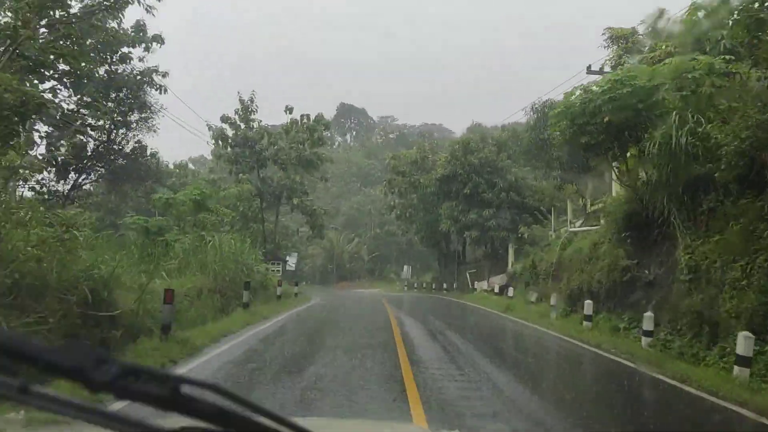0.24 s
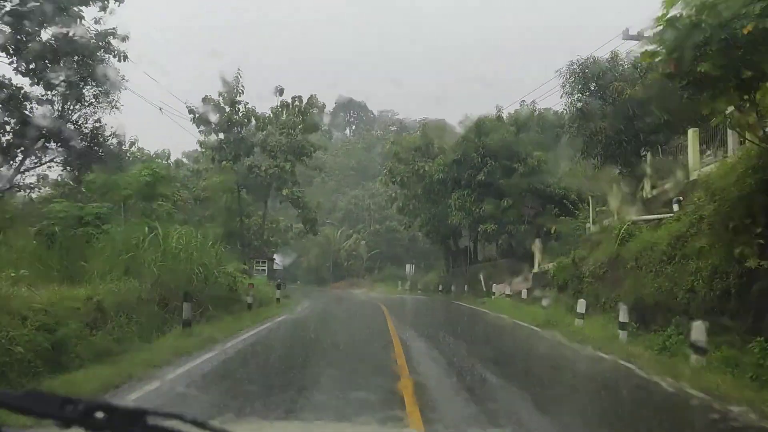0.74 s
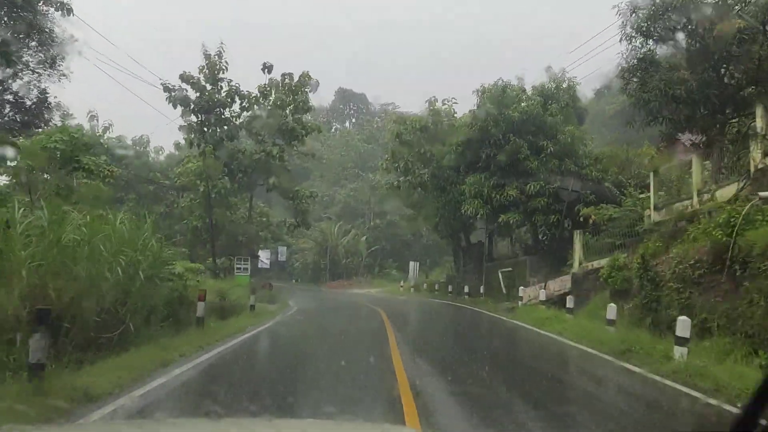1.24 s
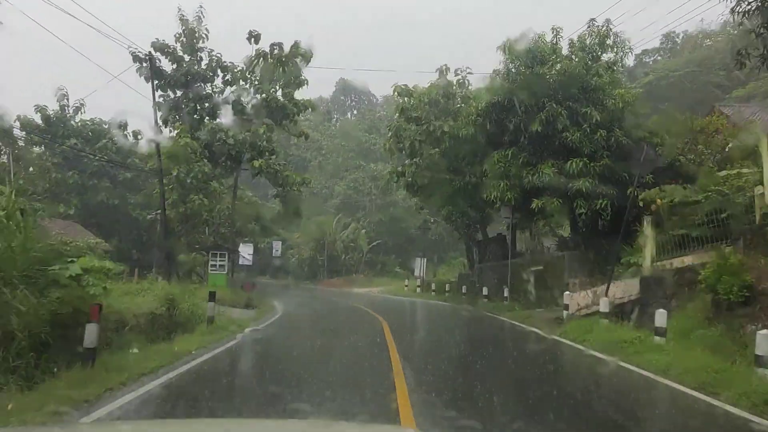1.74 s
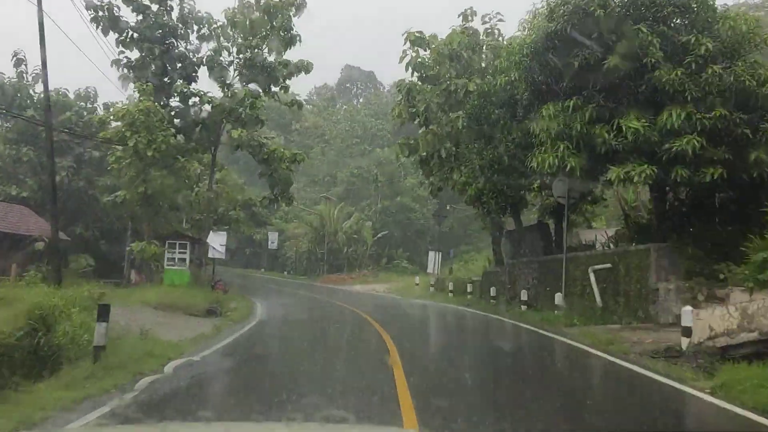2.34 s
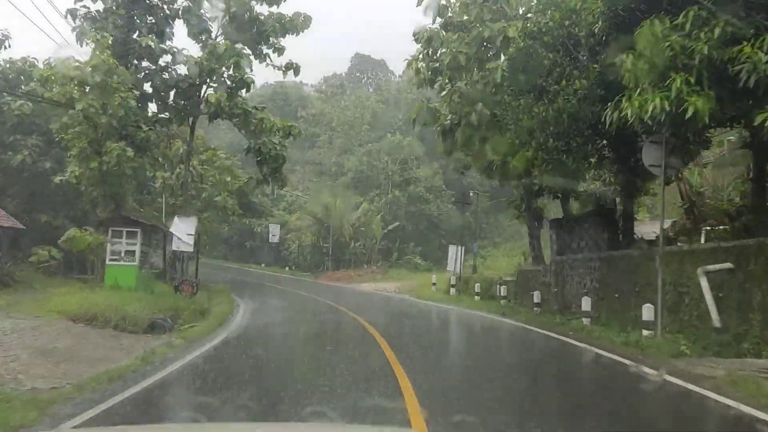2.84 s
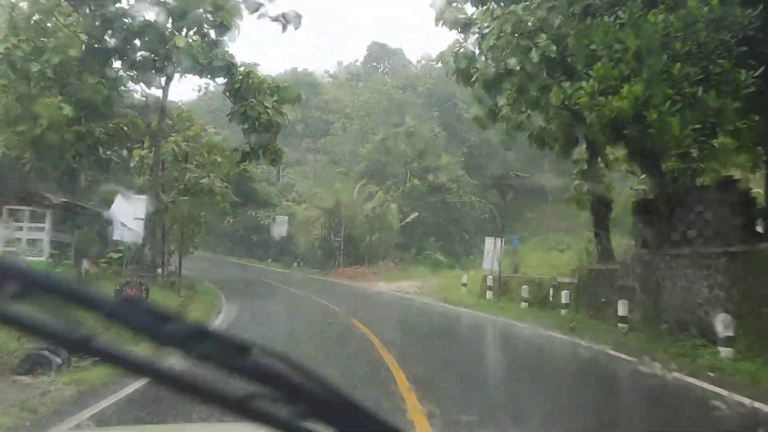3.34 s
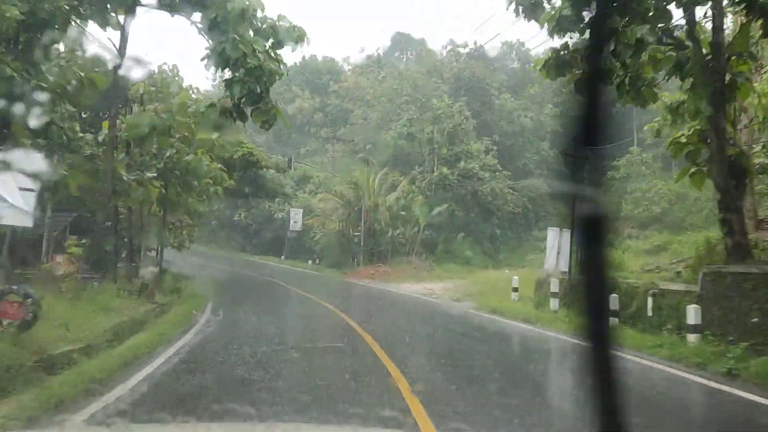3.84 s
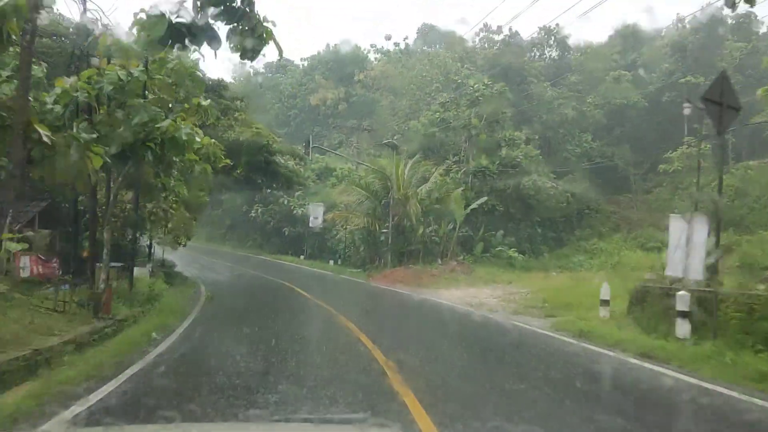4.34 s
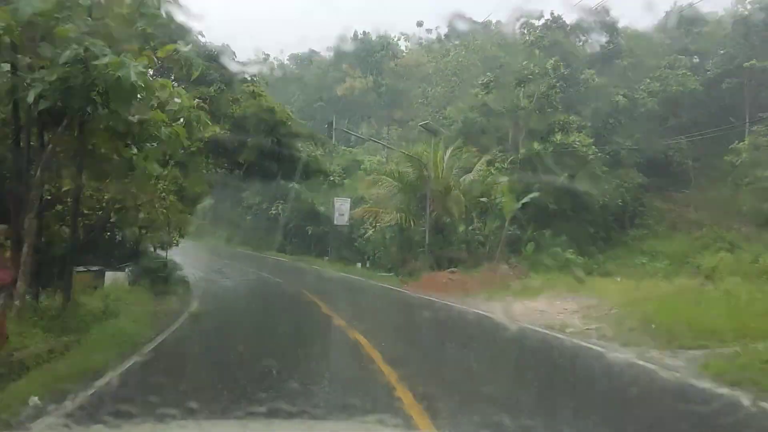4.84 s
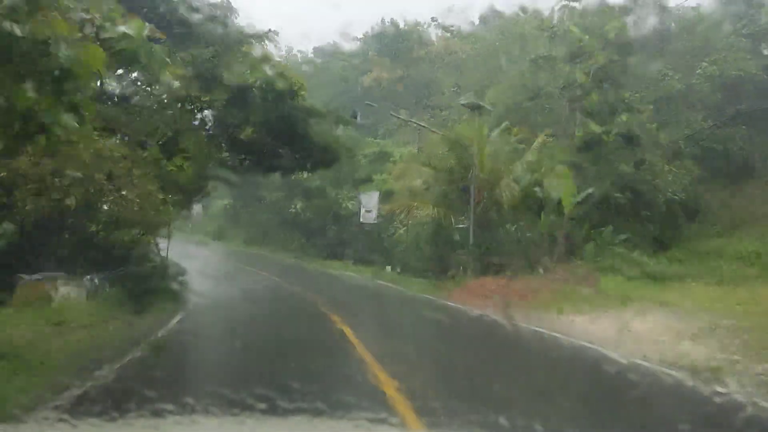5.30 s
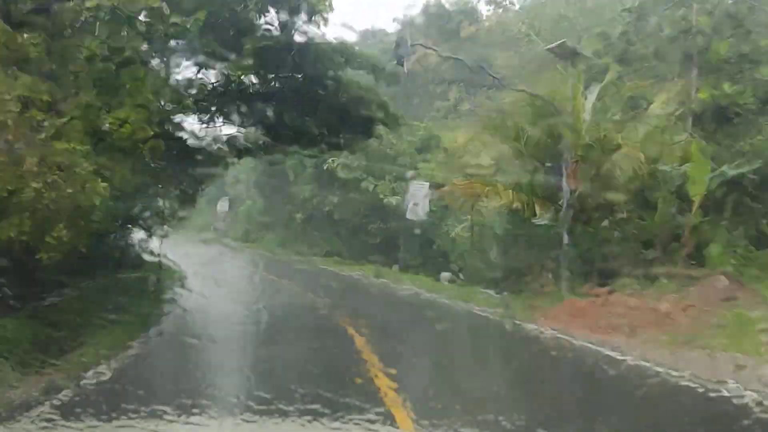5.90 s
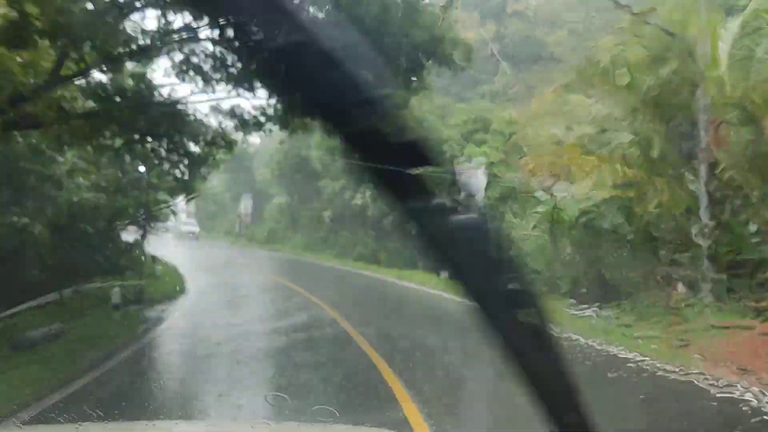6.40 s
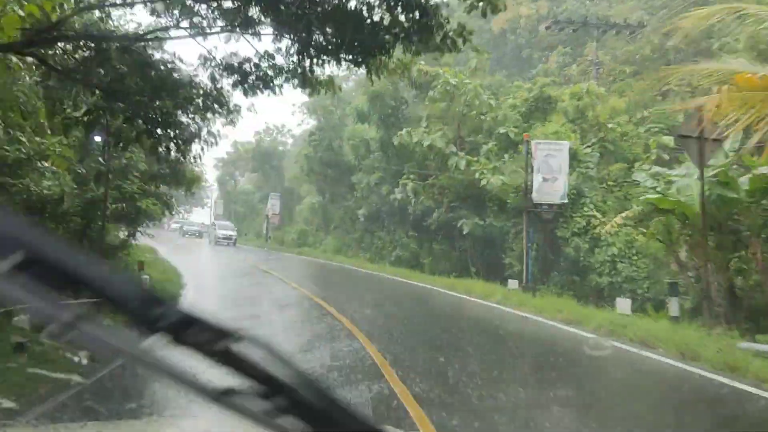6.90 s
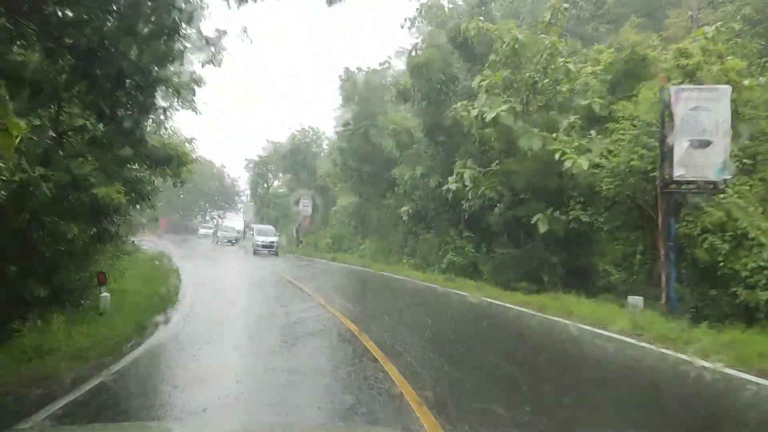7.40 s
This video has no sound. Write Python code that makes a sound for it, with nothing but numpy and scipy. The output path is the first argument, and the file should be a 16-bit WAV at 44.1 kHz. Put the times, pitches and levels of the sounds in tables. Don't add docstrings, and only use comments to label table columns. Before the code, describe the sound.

Inside a car travelling at nearly constant speed on a wet road, heard in stereo from the dashboard for about 7.7 seconds. Deep, throbbing tyre boom, engine hum and low road roar run throughout, the pitch rising very slightly towards the end. Above them heavy rain keeps up a dense, bright, grainy patter and hiss with a drumming roof panel, fluttering gently and a little softer from about 3 to 6.5 seconds. Irregular drips tick and pop on the glass from 0.2 seconds, with fat ones near 2.0, 2.1 and 2.5. From 4.2 knocks become more frequent; at 5.2 to 5.5 a cluster of roof knocks, glassy tocks and short dull splats arrives. Scattered drips follow until 7.1, when loads of water shed by branches hit, strongest near 7.3, with rapid hard knocks continuing to the end.

```python
import sys
import numpy as np
from scipy import signal
from scipy.fft import rfft, irfft, next_fast_len
from scipy.io import wavfile
from scipy.ndimage import uniform_filter1d

SR = 44100
rng = np.random.default_rng(int(sys.argv[2]) if len(sys.argv) > 2 else 0)


def linear_from_db(decibels):
    return 10 ** (np.asarray(decibels, float) / 20)


def inscribe(sig):
    pcm = np.round(np.clip(np.atleast_2d(sig).T, -1, 1) * 32767)
    wavfile.write(sys.argv[1], SR, pcm.astype(np.int16))


N = 337615
WHEEL_HZ, SHAFT_HZ, FIRING_HZ = 4.545, 20.22, 57.75
HALVES = np.array([[.5], [-.5]])

# time in seconds, speed as a factor on cruising.
ROAD_SPEED = [(0.0, 1.0002), (0.7, 0.999), (1.39, 0.9996), (2.09, 1.0004), (2.79, 0.9971), (3.48, 0.9896),
              (4.18, 0.9841), (4.87, 0.9886), (5.57, 0.9975), (6.27, 1.0105), (6.96, 1.0282),
              (7.66, 1.0454)]
# time in seconds, first shaft order in dB, second order in dB, engine load in dB.
DRIVE_LEVELS = [(0, -12.5, -22, 3), (.63, -16.5, -14, 0), (1.27, -13, -17, 3), (1.9, -14.5, -19.5, 1),
                (2.5, -15.5, -20, -3), (3.2, -24, -24.5, -3.5), (3.8, -18.5, -15.5, -3),
                (4.4, -15.5, -20.5, -5), (5.1, -14, -14, 1), (5.7, -23, -16.5, -17), (6.3, -12, -16.5, -1),
                (7, -17.5, -35, 1.5), (7.66, -17, -13.5, 7)]
# multiple of the firing rate, rms level in dB, share of the load change.
ENGINE_ORDERS = [(1, -26, -.2), (1.25, -43, .3), (1.5, -47, .3), (1.75, -43, .3), (2, -30, .4),
                 (2.25, -47, .3), (2.75, -45, .4), (3, -39, 2.1), (4, -52, 1.1)]
# frequency in Hz, rms level of one order in dB.
TYRE_BOOM = [(9, -46), (13.6, -31), (20, -39), (27, -31), (32, -24), (38, -30), (45, -28), (55, -25),
             (60, -43), (80, -47), (97, -39), (125, -46), (180, -49), (215, -53)]
# frequency in Hz, density in dB per Hz.
ROAD_ROAR = [(5, -54), (14, -17), (32, 1.5), (55, -3.5), (64, -5), (85, -13.5), (120, -8.5), (150, -17),
             (178, -14.5), (212, -17), (255, -26), (325, -27), (640, -31.5), (1000, -51), (4000, -110)]
# frequency in Hz, correlation.
CABIN_LIKENESS = [(60, 1), (130, 1), (290, 0.89), (630, 0.27), (1370, -0.0), (2990, 0.85), (6540, 0.0),
                  (14300, 0.01)]
# frequency in Hz, density in dB per Hz.
ROOF_PANEL = [(130, 1.5), (220, -5.5), (330, 3), (470, -3.5), (650, -6.5), (800, -11), (1500, -51),
              (5000, -90)]
# start in seconds, length in seconds, level in dB.
SHED_LOADS = [
    (5.231, 0.025, -38),
    (5.374, 0.033, -35),
    (7.139, 0.1, -37),
    (7.296, .04, -33.5),
    (7.374, 0.12, -40.5),
    (7.56, .12, -35),
]
# start in seconds, peak in dB, pitch in Hz, t60 in seconds,
# left-right difference in dB.
GLASS_TOKS = [(4.201, -20.5, 1310, 0.035, -8), (5.347, -18, 4300, 0.016, 4), (4.7, -27, 2600, 0.0083, -3),
              (5.4, -20, 500, 0.068, 6), (5.243, -19, 2250, 0.011, -2), (5.492, -23, 6600, .008, -3),
              (7.2575, -18, 3500, .01, -6), (7.373, -26, 5000, .005, -4), (7.526, -26, 8200, 0.0052, -2),
              (7.2575, -15.5, 2500, 0.012, -3), (7.2575, -20, 5700, .006, 0), (7.513, -43, 5000, .008, -8),
              (7.226, -20, 4100, .01, 3), (7.29, -32, 4500, .008, 0)]
# start in seconds, peak in dB, left-right difference in dB.
SMALL_DRIPS = [(0.2476, -17, 0), (0.4437, -20, 1), (0.4833, -25, -5.5), (0.7604, -20, -8), (0.9, -27, -3.5),
               (0.9807, -19, -5), (1.274, -27, -0.5), (1.411, -23, -7), (1.5174, -19.5, -5),
               (1.6484, -24, -1), (1.701, -18.5, -6), (2.1916, -19, -3.5), (2.634, -20, -1),
               (2.7154, -27, -18), (3.023, -24, -13), (3.2514, -31, -4.0), (3.3273, -24, -4.0),
               (3.383, -20, 0), (3.8414, -22, -2.5), (3.999, -20, -3.0), (4.4214, -21, 1),
               (4.6778, -24, -2.0), (4.7102, -22, 5), (5.0399, -19, -1), (5.1734, -25, 11),
               (5.8754, -22, -4.0), (6.4504, -21, 3), (6.6326, -20, 0), (6.9102, -21, -2.0),
               (7.0105, -19.5, -4.5)]
# start in seconds, peak in dB, knock in Hz, left-right difference in dB.
ROOF_KNOCKS = [(0.7496, -28, 1630, 6), (0.8026, -25, 1620, -3), (1.8746, -49, 2210, -21),
               (3.691, -24, 1880, -3), (4.199, -28, 2150, -4), (4.252, -42, 1650, -4),
               (4.4214, -27, 2950, -6), (4.574, -28, 1810, 1.5), (5.229, -22, 1870, -3),
               (5.347, -17.5, 2680, -4), (5.3991, -25, 2010, -5), (5.5174, -39, 2750, 2),
               (5.7934, -29, 4330, 1.0), (6.032, -38, 1640, -0.5), (6.273, -32, 3810, 0.5),
               (6.43, -26, 2130, -4), (6.6089, -34, 1710, -0.5), (7.1514, -24, 1610, 0.5),
               (7.2328, -22, 1620, -6), (7.2565, -23, 2660, 3), (7.346, -22, 3220, 0.5),
               (7.4687, -32, 4020, -4), (7.4972, -19.5, 4170, -1), (7.531, -24, 2510, 1),
               (7.5772, -20, 1650, -3), (7.6248, -23.5, 2640, -6)]
# start in seconds, peak in dB, knock in Hz, left-right difference in dB.
GLASS_DRIPS = [(0.4369, -18, 2060, 0), (0.5355, -17.5, 1780, 2), (0.834, -19, 1870, 5),
               (1.0462, -18.5, 1790, -6.0), (1.9754, -16.5, 4080, -8), (2.1031, -15, 2800, 3),
               (2.5301, -14.5, 2060, -8), (3.267, -20.5, 1880, -3.5), (3.7374, -18, 2150, -2.5),
               (4.0723, -21, 2050, -5.5), (4.1927, -15, 2160, 2), (4.2515, -18, 3030, -1.5),
               (4.7486, -18.5, 3480, -6), (4.998, -21, 2020, -2), (5.2295, -20, 1830, -4.5),
               (5.3485, -21, 4190, -5.5), (5.4909, -23, 1910, -4.0), (6.1045, -23, 1750, -8),
               (6.33, -19, 3450, -5), (6.6207, -19, 2080, -6), (6.7288, -18.5, 4820, 2),
               (6.9703, -23, 1780, 4), (7.0973, -21, 1890, -6), (7.2334, -16, 2030, 2),
               (7.2569, -39, 2660, 2), (7.3462, -17, 1860, -1.0), (7.469, -16.5, 4340, -10),
               (7.4959, -25, 4170, -12), (7.5303, -15.5, 2510, -7), (7.5961, -14, 3080, -8)]
# time in seconds, level in dB.
RAIN_LEVEL = [(0, -33), (.25, -35), (1, -34.5), (2.1, -34.5), (2.77, -35.5), (3.2, -36.5), (3.84, -36.5),
              (4.25, -35.5), (4.45, -36), (5.3, -35.5), (5.55, -36), (6.5, -36.5), (6.75, -34.5),
              (7.2, -35.5), (7.35, -35.5), (7.44, -41), (7.52, -35.5), (7.63, -36)]
# frequency in Hz, density in dB per Hz.
SPLASH_SPECTRUM = [(300, -7), (600, -4), (1000, 2), (1600, 2.5), (2500, -2.5), (3800, -2.5), (6000, -9),
                   (8000, -13), (11000, -13), (13000, -17), (15000, -10)]
# frequency in Hz, gain in dB.
NEAR_TONE = [(700, 5), (1400, -4), (2500, 1), (8000, 3), (14000, -7.5)]
# frequency in Hz, left-right difference in dB.
PORT_LEAN = [(30, -0.9), (65, -2), (120, 0.9), (300, 1), (500, 2.5), (800, 2), (1200, 1), (2600, -0.5),
             (6000, 0), (9000, -1), (11000, 4), (14000, -6.5)]
# resonance in Hz, width in Hz.
PORT_CAVITIES = [(11600, 2400), (9060, 1160)]


def evened(x):
    return x / np.sqrt(np.mean(x ** 2) + 1e-20)


def read(points, hz):
    f, value = np.transpose(points)
    return np.interp(np.log(hz + 1), np.log(f + 1), value)


def curves(rows):
    s, *columns = np.transpose(rows)
    return [np.interp(np.arange(N) / SR, s, c) for c in columns]


def coloured(x, points):
    size = next_fast_len(x.shape[-1])
    gain = linear_from_db(read(points, np.fft.rfftfreq(size, 1 / SR)))
    return irfft(rfft(x, size) * gain, size)[..., :x.shape[-1]]


def band(x, lo_hz, hi_hz):
    sos = signal.butter(2, [lo_hz, hi_hz], "band", fs=SR, output="sos")
    y = signal.sosfilt(sos, x)
    return y / abs(y).max(-1, keepdims=True)


def pair(points):
    size = next_fast_len(N)
    hz = np.fft.rfftfreq(size, 1 / SR)
    a, b = rfft(rng.standard_normal((2, size)))
    same = np.clip(read(CABIN_LIKENESS, hz), -1, 1)
    right = same * a + np.sqrt(1 - same ** 2) * b
    return evened(irfft(np.array([a, right]) * linear_from_db(read(points, hz)), size)[:, :N])


def gusts(seconds):
    size = max(round(seconds * SR), 2)
    smooth = uniform_filter1d(rng.standard_normal(N), size)
    return evened(uniform_filter1d(smooth, size))


def road():
    return linear_from_db(-19.5) * pair(ROAD_ROAR)


def drivetrain():
    step = 20
    turns = 2 * np.pi * np.cumsum(curves(ROAD_SPEED)[0])[::step] / SR
    first_db, second_db, load_db = (c[::step] for c in curves(DRIVE_LEVELS))
    hum = linear_from_db(first_db) * np.sin(SHAFT_HZ * turns)
    hum += linear_from_db(second_db) * np.sin(2 * SHAFT_HZ * turns + 1)
    hum += linear_from_db(-41) * np.sin(3 * SHAFT_HZ * turns) + linear_from_db(-44) * np.sin(4 * SHAFT_HZ * turns)
    for order, db, share in ENGINE_ORDERS:
        phase = 2 * np.pi * rng.random()
        hum += linear_from_db(db + share * load_db) * np.sin(order * FIRING_HZ * turns + phase)
    order = np.arange(2, 49)[:, None]
    for slip in (.997, 1.004):
        size_db = read(TYRE_BOOM, order * WHEEL_HZ) - 3 + 4.78 * rng.standard_normal(order.shape)
        phase = 2 * np.pi * rng.random(order.shape)
        hum += (linear_from_db(size_db) * np.sin(order * WHEEL_HZ * slip * turns + phase)).sum(0)
    return np.sqrt(2) * signal.resample_poly(hum, step, 1, padtype="line")[:N]


def patter(per_s, spread_db, t60, count):
    struck = rng.random(N) < per_s / SR
    size = linear_from_db(spread_db * np.minimum(rng.exponential(1, N), 4)) * struck
    patch = rng.integers(0, count, N)
    t, out = np.arange(2000) / SR, np.zeros((2, N))
    for k in range(count):
        path = rng.standard_normal((2, len(t))) * linear_from_db(-60 * t / t60) * np.minimum(t / (0.11 * t60), 1)
        out += signal.oaconvolve((size * (patch == k))[None], path, axes=1)[:, :N]
    return evened(out)


def shed():
    t = np.arange(N) / SR
    load = np.zeros(N)
    for s, length, db in SHED_LOADS:
        rise = np.clip((t - s) / 0.016, 0, 1)
        fall_db = 300 * np.maximum(t - s - length, 0)
        load += rise * linear_from_db(db - fall_db)
    splats = evened(band(patter(360, 2.4, 0.063, count=3), 620, 2650))
    return load * (splats + linear_from_db(7) * pair(ROOF_PANEL))


def toks():
    t, out = np.arange(3000) / SR, np.zeros((2, N + 3000))
    for s, db, hz, t60, pan_db in GLASS_TOKS:
        ring = np.sin(2 * np.pi * (hz * t + rng.random((2, 1))))
        ring *= linear_from_db(-60 * t / t60) * np.minimum(t / 0.00023, 1)
        out[:, round(s * SR):][:, :len(t)] += linear_from_db(db + HALVES * pan_db) * ring
    return out[:, :N]


def drips(rows, tick_db, knock_db, thud_db):
    t, out = np.arange(3000) / SR, np.zeros((2, N + 3000))
    for s, db, hz, pan_db in rows:
        tick, knock = rng.standard_normal((2, 2, len(t)))
        spray = 0.079 * linear_from_db(-60 * t / 0.097)
        tick = tick * np.minimum(t / 0.0014, 1) ** 2 * (linear_from_db(-60 * t / 0.0049) + spray)
        tick = band(tick, 2300, 11000)
        knock = knock * np.minimum(t / 0.0017, 1) * (linear_from_db(-60 * t / 0.0065) + 0.17 * linear_from_db(-60 * t / 0.082))
        knock = 0.42 * band(knock, 0.78 * hz, 1.23 * hz) + band(knock, 1220, 4900)
        thud = np.sin(2 * np.pi * rng.uniform(263, 638) * t) * linear_from_db(-60 * t / 0.058)
        drip = linear_from_db(tick_db) * tick + linear_from_db(knock_db) * knock + linear_from_db(thud_db) * thud
        side = linear_from_db(HALVES * (pan_db + 3.5))
        out[:, round(s * SR):][:, :len(t)] += linear_from_db(db) * side * drip
    return out[:, :N]


def spits():
    s, db, pan_db = np.transpose(SMALL_DRIPS)
    knock_hz = 1700 * 2.5 ** rng.random(len(s)) ** 2
    return drips(np.transpose([s, db, knock_hz, pan_db]), tick_db=-7.5, knock_db=-13, thud_db=-18)


def rain():
    rain_db = curves(RAIN_LEVEL)[0]
    panel_db = -34.5 + 0.95 * (rain_db - rain_db.mean()) + 2 * gusts(0.042)
    sheet = linear_from_db(0.53 * gusts(0.09) + .6 * gusts(0.058) + 0.54 * gusts(0.0079))
    ticks = 0.58 * patter(900 * sheet, 1.2, 0.0053, count=7)
    ticks += .5 * patter(200, 2.45, 0.034, count=5)
    far = 0.89 * sheet * rng.standard_normal((2, N))
    splash = evened(coloured(coloured(ticks, NEAR_TONE) + far, SPLASH_SPECTRUM))
    return linear_from_db(rain_db + 0.11) * splash + linear_from_db(panel_db) * pair(ROOF_PANEL)


def scene():
    car = drivetrain() + road()
    glass = drips(GLASS_DRIPS, tick_db=-7, knock_db=-14, thud_db=-13.5)
    roof = drips(ROOF_KNOCKS, tick_db=-23, knock_db=0, thud_db=-5)
    closing = np.minimum((N - np.arange(N)) / (.012 * SR), 1)
    return (car + glass + roof + toks() + spits() + rain()) * closing + shed()


def low_pass(x):
    return signal.sosfilt(signal.butter(12, 14890, fs=SR, output="sos"), x)


def record(dry):
    size = next_fast_len(N + 2000)
    f = np.fft.rfftfreq(size, 1 / SR)
    ports = np.array([1 / (1 - (f / hz) ** 2 + 1j * f * width / hz ** 2) for hz, width in PORT_CAVITIES])
    ports *= linear_from_db(HALVES * read(PORT_LEAN, f))
    edge_hz = 14230
    ports *= np.where(f < edge_hz, 1, linear_from_db(-17 - (f - edge_hz) / 30))
    heard = irfft(rfft(dry, size) * ports, size)[:, :N]
    bass = uniform_filter1d(heard, 100)
    heard /= (1 + (bass / .82) ** 6) ** (1 / 6)
    return low_pass(heard)


dry = scene()
out = record(dry)
inscribe(out)
```